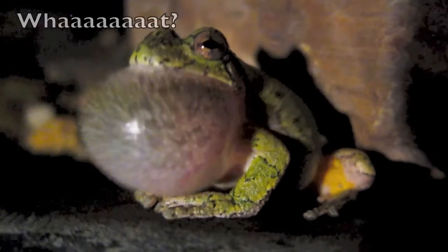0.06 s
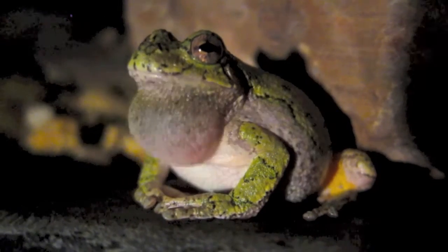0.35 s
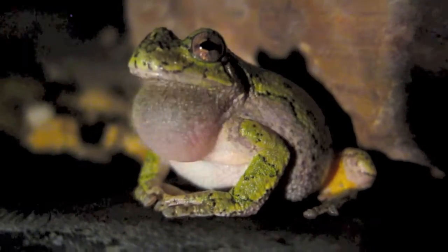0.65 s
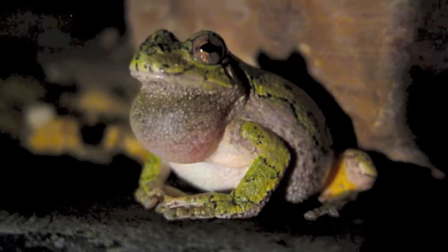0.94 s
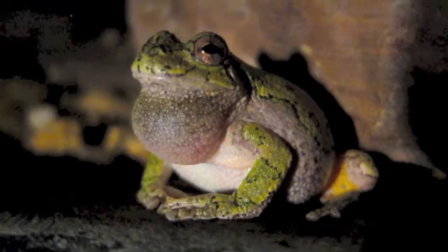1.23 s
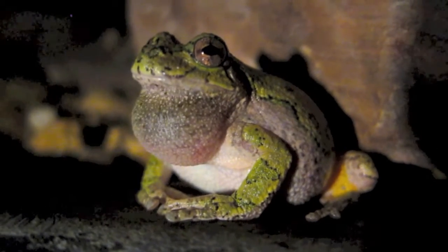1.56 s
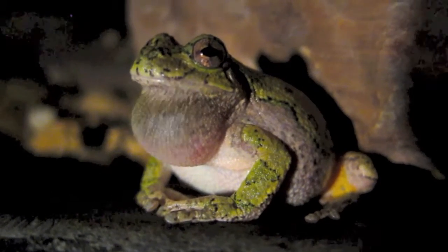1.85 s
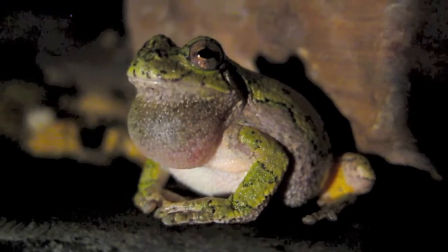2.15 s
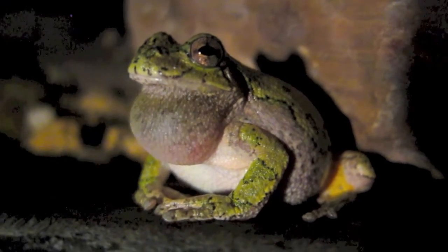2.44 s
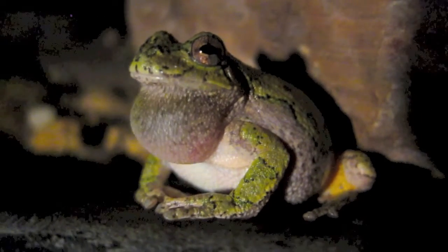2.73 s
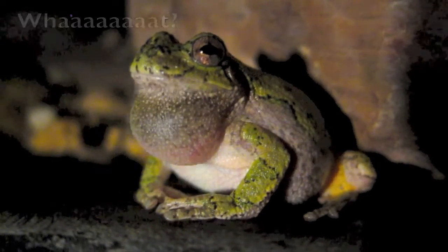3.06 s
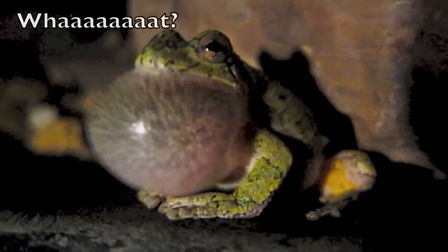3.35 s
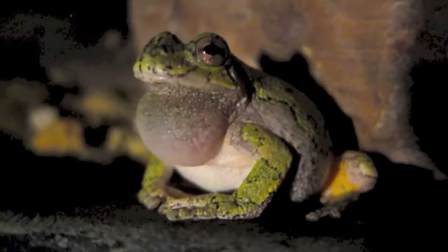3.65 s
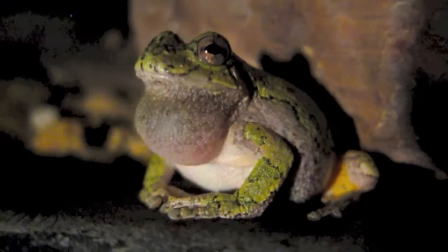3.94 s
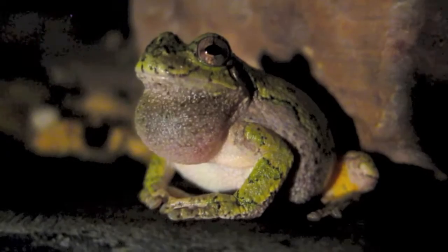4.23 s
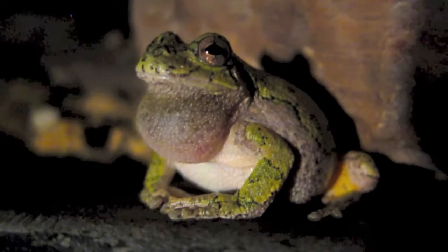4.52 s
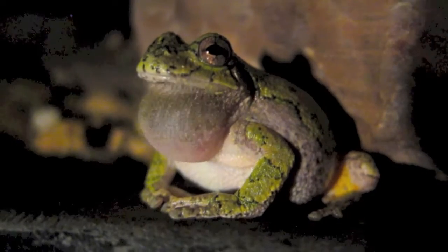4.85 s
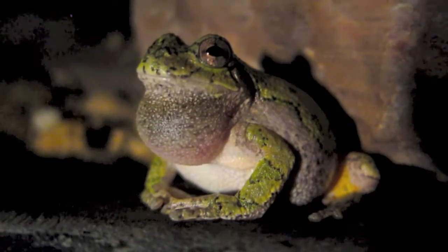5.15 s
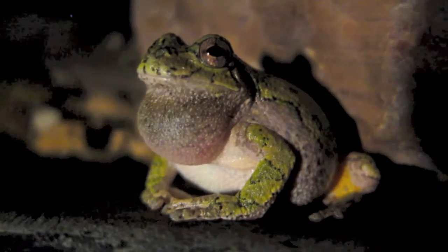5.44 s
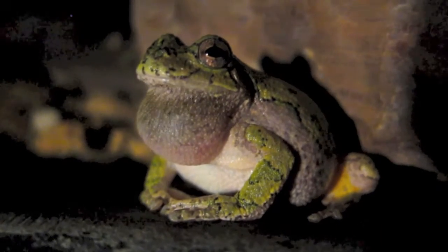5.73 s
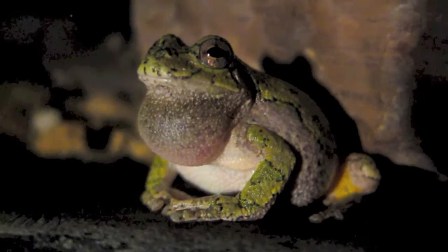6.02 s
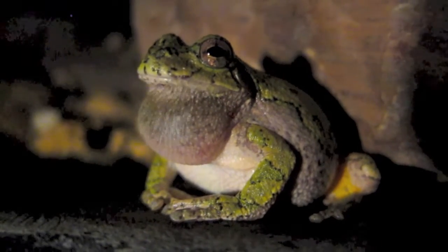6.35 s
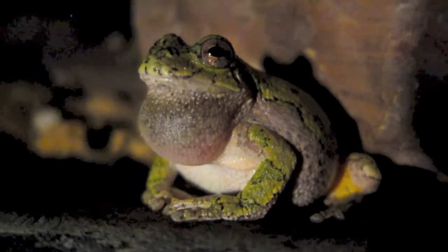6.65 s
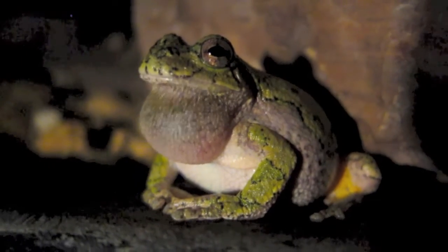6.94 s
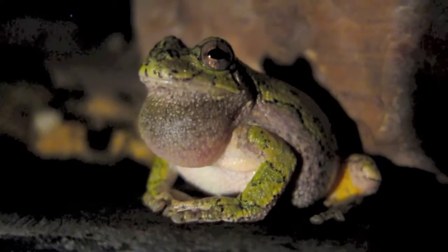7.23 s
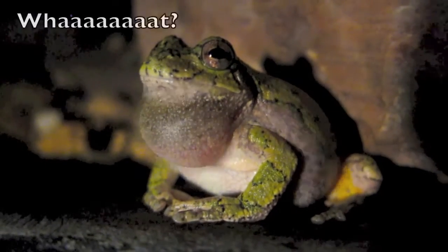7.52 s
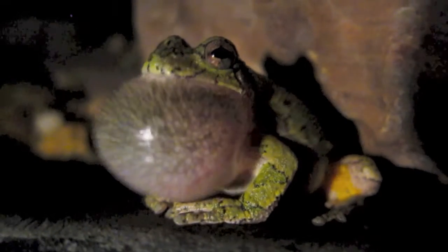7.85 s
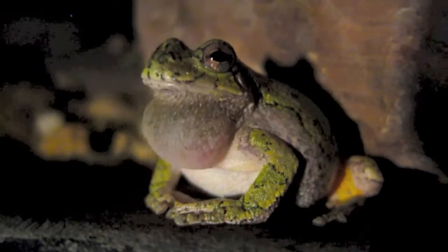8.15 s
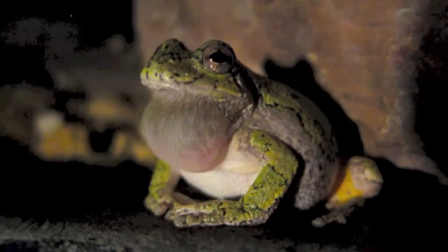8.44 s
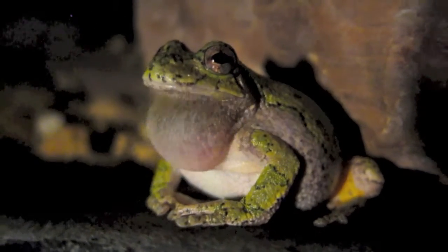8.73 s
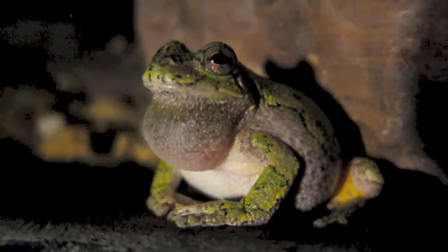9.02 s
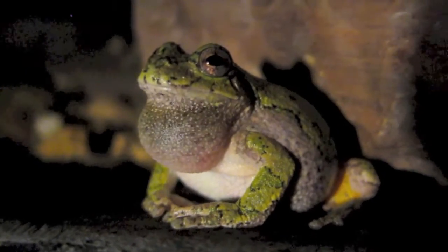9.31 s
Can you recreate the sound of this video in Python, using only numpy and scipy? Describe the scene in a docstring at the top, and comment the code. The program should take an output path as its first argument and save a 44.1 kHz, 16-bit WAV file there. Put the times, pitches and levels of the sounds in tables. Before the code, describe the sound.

A single treefrog calls very close to the microphone beside a garden pond at night. Its first trill is already under way and ends at about 0.2 seconds. Two more come at about 3.1 and 7.6 seconds, each lasting under half a second. Each is a loud, rapid run of high, ringing, slightly buzzy pulses that quickly climb in pitch and strength, then hold steady. Much more quietly, a little to the left, water trickles into the pond throughout, with a fine fizz, soft bubbling, plinking drips and tiny sharp splashes. The drips are busiest from about 1 to 2.5 seconds, from 5 to 7.3, and again around 9. A faint, low, distant rumble lies underneath. Each trill pushes the background down in level, and the water swells back slowly afterwards, carrying on until the end at about 9.5 seconds.

```python
"""A treefrog, close to the microphone beside a garden pond at night, gives three short trills.
Each trill is a run of larynx pulses that rise in pitch and ring on in the vocal sac.
A little to the left, water trickles into the pond: spray fizzes, and drips and splashes trap
ringing bubbles. The distant night murmurs underneath. The recorder's gain control ducks
under each trill and lets the water swell back slowly."""
import sys
import numpy as np
from scipy import signal
from scipy.fft import rfft, irfft, next_fast_len
from scipy.io import wavfile
from scipy.ndimage import uniform_filter1d

SR = 44100
rng = np.random.default_rng(int(sys.argv[2]) if len(sys.argv) > 2 else 0)


def dump_mix(stems):
    """Bounce the given channels to the path in sys.argv[1] as a 16-bit WAV at rate SR."""
    frames = np.atleast_2d(stems).T  # one column per channel
    limited = np.clip(frames, -1, 1)  # hard clip at full scale
    pcm = np.round(limited * 32767).astype(np.int16)
    wavfile.write(sys.argv[1], SR, pcm)


N = 418068


def from_db(db):
    """Decibels to gain."""
    return 10 ** (np.asarray(db) / 20)


def rms_one(x):
    """Scale to unit power."""
    return x / np.sqrt(np.mean(x ** 2) + 1e-20)


def add(track, start_s, sound):
    """Mix a sound into a track."""
    at = max(0, round(start_s * SR))
    part = sound[..., :max(0, N - at)]
    track[..., at:at + part.shape[-1]] += part


def delayed(x, seconds):
    """A later copy of a sound."""
    size = next_fast_len(N + SR // 10)
    hz = np.fft.rfftfreq(size, 1 / SR)
    return irfft(rfft(x, size) * np.exp(-2j * np.pi * hz * seconds), size)[..., :N]


def coloured(x, spectrum):
    """Shape a sound by a smooth curve of (Hz, dB) points; rms 1."""
    size = next_fast_len(N + SR // 10)
    hz, level_db = np.transpose(spectrum)
    gain = from_db(np.interp(np.log(np.fft.rfftfreq(size, 1 / SR) + 1), np.log(hz), level_db))
    return rms_one(irfft(rfft(x, size) * gain, size)[..., :N])


def treble(x, above_hz):
    """The part of a sound above a frequency."""
    return signal.sosfiltfilt(signal.butter(4, above_hz, "high", fs=SR, output="sos"), x)


def drift(rate_hz):
    """A random curve over the whole scene, with a spread near 1."""
    steps = np.arange(N) * rate_hz / SR
    return np.interp(steps, np.arange(N // 20), rng.standard_normal(N // 20))


def wavering(count, size):
    """Noise smoothed over size samples; rms 1."""
    return rms_one(uniform_filter1d(rng.standard_normal(count), size=size))


def left_first(x, lead_s):
    """A source off to the left reaches that side of the microphone first."""
    x = np.atleast_2d(x)
    return np.array([x[0], delayed(x[-1], lead_s)])


def garden(x, t60, wet_db, dull_hz, gap_s):
    """Scatter from stones, plants and boards: a short tail, different in each channel."""
    t = np.arange(SR // 3) / SR
    tail = rng.standard_normal((2, len(t))) * from_db(-60 * t / t60) * (t > gap_s)
    tail /= np.sqrt(np.sum(tail ** 2, axis=1, keepdims=True))
    tail = signal.sosfilt(signal.butter(1, dull_hz, fs=SR, output="sos"), tail)
    return from_db(wet_db) * signal.fftconvolve(np.atleast_2d(x), tail, axes=1)[:, :N]


def trill(start_s, period_s, head_start, pulses=23, plateau_hz=1269, flat_hz=287, wobble_hz=9):
    """Effort builds and pitch climbs as the sac fills. Each row: start in s, pitch in Hz, effort 0-1."""
    k = np.arange(pulses)
    warmed = k + head_start
    # pulses come slower at both ends of the trill
    gaps_s = period_s + .0041 * np.exp(-warmed / 1.6) + .0018 * np.exp((k - k[-2]) / 1.6)
    pitch_hz = plateau_hz - flat_hz * np.exp(-warmed / 2.04) + wobble_hz * rng.standard_normal(pulses)
    effort = 1 - np.exp(-(warmed / 2.15) ** 1.5)
    stagger_s = .00016 * rng.standard_normal(pulses)
    return zip(start_s + np.cumsum(gaps_s) - gaps_s + stagger_s, pitch_hz, effort)


def tick(effort, hz=2300, level_db=-22, octave_db=-6, peak_s=.0006):
    """The faint tick before a push of air; it also stirs the sac an octave lower."""
    t = np.arange(SR // 100) / SR
    phase = 2 * np.pi * hz * (1 + .08 * rng.standard_normal()) * t
    shape = np.e * t / peak_s * np.exp(-t / peak_s)
    return from_db(level_db) * effort * shape * (np.sin(phase) + from_db(octave_db) * np.sin(phase / 2))


def sac_puff(t, level_db=-31, swell_s=.0015):
    """The sac jerks outward and settles: a faint low puff."""
    swell = t / swell_s
    return from_db(level_db) * np.e * swell * (1 - swell / 2) * np.exp(-swell)


# The frog's harmonics at close range, from the fundamental up.
# Each row: relative level in dB, left minus right in dB.
FROG_HARMONICS = [(-6.5, 2.8), (-0.5, -2.5), (-18.5, -1), (-25.5, 0.5), (-24.5, -6), (-26.5, -6.5),
                  (-38.5, -5.5), (-33, -6), (-38.5, -18), (-36.5, -14.5)]


def frog_pulse(pitch_hz, effort, glide=.13, glide_s=.006665, rasp_db=-27, croak_db=-17):
    """One push of air: the pitch climbs, then the larynx stops and the sac rings on alone."""
    larynx_t60, sac_t60 = .010, .021
    body_hz, body_db, body_t60 = 1045, -17, .026
    t = np.arange(SR // 25) / SR
    slack = 1 / (1 + np.exp((effort - .5) / .08))   # the folds tighten and buzz past half effort
    push_s = (.0045 + .0025 * effort ** 5) * (1 + .04 * rng.standard_normal())
    climb = np.clip(t / (glide_s * (1 + .09 * rng.standard_normal())), 0, 1) ** 1.8
    hz = pitch_hz * (.9517 + glide * climb - .06 * slack * (1 - climb))   # slack pulses start flatter
    jitter = 1 + .009 * wavering(len(t), size=14)
    phase = 2 * np.pi * np.cumsum(hz * jitter) / SR
    opening = (1 - np.exp(-(t / (.0009 + .0032 * slack)) ** 2)) ** (1 + slack)
    after_s = np.maximum(t - push_s, 0)
    overtones_db = -16 * slack + .6 * rng.standard_normal()   # a weak push is mostly fundamental
    larynx = opening * from_db(overtones_db - 60 * after_s / larynx_t60)
    # while the folds buzz they draw strength from the fundamental
    drawn_db = 7 * (1 - slack) * np.exp(-((t / push_s - .36) / .38) ** 2)
    sac = opening * from_db(4 * slack - drawn_db - 60 * after_s / sac_t60)
    # the folds only snap shut once they swing fully, so the buzz starts late and ends early
    snap = (1 - np.exp(-(t / .0013) ** 2)) / (1 + np.exp((t - push_s + .0001) / .0006))
    buzz = larynx * snap * from_db(9 * slack)
    rasp = from_db(rasp_db) * buzz * (1 + np.cos(phase)) / 2 * rng.standard_normal((2, len(t)))
    tone = np.zeros((2, len(t)))
    for k, (level_db, pan_db) in enumerate(FROG_HARMONICS, 1):
        flutter = from_db(1.3 * rng.standard_normal()) * (1 + .3 * wavering(len(t), size=40))
        envelope = sac if k == 1 else larynx if k == 2 else buzz * flutter
        if k == 3:   # the third harmonic blooms as the pitch climbs
            envelope = envelope * (.45 + .9 * climb)
        sides = from_db([[level_db + pan_db / 2], [level_db - pan_db / 2]])
        tone += sides * envelope * np.sin(k * phase)
    # slack folds flap unevenly: the first pulses croak
    croak = from_db(croak_db) * slack * opening * snap * np.sin(2 * phase) * wavering(len(t), size=16)
    # the push knocks a lower ring out of the body, which beats against the fundamental
    body_ring = from_db(body_db - 60 * t / body_t60) * np.cos(2 * np.pi * body_hz * t)
    body = (1 - slack) * opening * body_ring
    loudness = np.tanh(effort / .24)
    return loudness * (rasp + tone + croak + body + effort * sac_puff(t))


# The trills, close to the microphone; the first is already under way.
# Each row: start in seconds, pulse period in seconds, head start of the effort in pulses.
FROG_TRILLS = [(-.2331, .01755, 1), (3.1469, .01759, .15), (7.5997, .01737, .75)]


def frog(level_db=19, tick_lead_s=.0034, bounce_s=.00204, far_db=-31, far_s=.0095):
    """The frog, with a close bounce that colours the overtones and a fainter slap from farther off."""
    voice = np.zeros((2, N))
    for row in FROG_TRILLS:
        for k, (s, pitch_hz, effort) in enumerate(trill(*row)):
            if s > -tick_lead_s:
                add(voice, s, frog_pulse(pitch_hz, effort))
            if k > 0 and s > tick_lead_s:
                add(voice, s - tick_lead_s, tick(effort))
    bounce = .3 * treble(delayed(voice, bounce_s), above_hz=1800)
    slap = from_db(far_db) * delayed(voice, far_s)
    voice = left_first(voice + bounce + slap, lead_s=.00004)
    near = garden(voice, t60=.06, wet_db=-23, dull_hz=7000, gap_s=.004)
    yard = garden(voice, t60=.31, wet_db=-49, dull_hz=4000, gap_s=.033)
    return from_db(level_db) * (voice + near + yard)


# The trickle into the pond. Each row: time in seconds, relative strength in dB.
TRICKLE_STRENGTH = [(0, -1), (1.45, 3.5), (2.2, 1.5), (4, -1.5), (5.7, 3), (6.5, 0.5), (7.9, -2), (9.3, 3)]


def flow_db(s):
    """The trickle swells and eases: its strength at the given times."""
    return np.interp(s, *np.transpose(TRICKLE_STRENGTH))


# The colour of the spray over the pond. Each row: frequency in Hz, relative gain in dB.
SPRAY_SPECTRUM = [(500, -34), (1500, -1.5), (2300, -7.5), (2750, -3), (3300, 0), (4600, -4), (5450, 0),
                  (6500, -6), (7300, -4), (10000, -4.5), (12500, -7), (14500, -12.5), (16000, -24)]


def spray(count=17000, cycles=25, scatter_s=.00004, pan_db=2.0, hiss=.84, samples=256):
    """Tiny droplets fizz in clumps over a hiss; each rings briefly at its own pitch and place."""
    at = rng.integers(0, N - samples, count)
    hz = rng.uniform(1670, 14140, (count, 1))
    clumps_db = 2.9 * drift(rate_hz=60) + 1.7 * drift(rate_hz=14)   # quick flicker, slower swell
    droplet_db = 2.5 * np.minimum(rng.exponential(1, count), 3.8)
    strength = from_db(droplet_db + clumps_db[at])[:, None] * np.sqrt(hz)
    lag, pan = rng.standard_normal((2, count, 1))
    where = (at[:, None] + np.arange(samples)).ravel()
    t, channels = np.arange(samples) / SR, []
    for side in (1, -1):
        arrival_s = scatter_s * (1 + side * lag / 2)
        turns = (hz * np.maximum(t - arrival_s, 0)).astype(np.float32)
        rings = np.sin(2 * np.pi * turns) * from_db(-60 * turns / cycles)
        gain = strength * from_db(side * pan * pan_db / 2)
        channels.append(np.bincount(where, (gain * rings).ravel(), N))
    return coloured(rms_one(np.array(channels)) + hiss * rng.standard_normal((2, N)), SPRAY_SPECTRUM)


def bubble(hz, t60, rise, attack_s=.00045):
    """A trapped bubble rings; a positive rise lifts its pitch as it nears the surface."""
    t = np.arange(int(t60 * SR) + 2) / SR
    envelope = (1 - np.exp(-t / attack_s)) * from_db(-60 * t / t60)
    return envelope * np.sin(2 * np.pi * hz * (t + rise * t * t / 2))


# The colour of the bubbling where the trickle lands. Each row: frequency in Hz, relative gain in dB.
GURGLE_SPECTRUM = [(250, -24), (470, -28), (575, 3.5), (660, 0.5), (760, 7), (900, 4), (1070, 0.5),
                   (1220, 2.5), (1520, -2.5), (1730, 6), (2300, -2), (3500, -47.5)]


def gurgle(count=6000, spread_db=1.0, cycles=20, rise=7):
    """Crowds of small bubbles ring under the falling water."""
    out = np.zeros(N)
    for (when, pitch, climb), strength in zip(rng.random((count, 3)), rng.standard_normal(count)):
        hz = 480 * 4.695 ** pitch
        gain = from_db(spread_db * min(strength, 2)) * np.sqrt(hz)
        add(out, when * N / SR, gain * bubble(hz, cycles / hz, rise * climb))
    return coloured(out, GURGLE_SPECTRUM)


# The colour of the night, far from the microphone. Each row: frequency in Hz, relative gain in dB.
NIGHT_SPECTRUM = [(15, -13), (35, -21), (55, -1.5), (120, 0), (185, -1), (270, -11.5), (370, -5.5),
                  (600, -4), (1500, -39)]


def night_rumble(level_db=-41.5, apart=.24):
    """Low murmur of the distant night, nearly alike in both channels."""
    noise = rng.standard_normal(N) + apart * rng.standard_normal((2, N))
    return from_db(level_db) * coloured(noise, NIGHT_SPECTRUM)


def stray_drops(low_hz, high_hz, level_db, spread_db, count):
    """Lesser drops fall at random, louder in strong flow. Each row: start in s, pitch in Hz, dB."""
    when, pitch, strength = rng.random((count, 3)).T
    s = when * N / SR
    hz = low_hz * (high_hz / low_hz) ** pitch
    return np.c_[s, hz, level_db + spread_db * (strength - .5) + flow_db(s)]


# The loudest drips into the pond. Each row: start in seconds, bubble pitch in Hz,
# relative level in dB, rise in pitch as a share per second (negative falls).
POND_DRIPS = [(0.335, 993, -19, -3), (0.551, 740, -20.5, 1), (0.886, 730, -22.5, 2.5), (0.9, 784, -21, 1.5),
              (0.931, 904, -18, 6.5), (0.958, 934, -20, 19), (1.087, 1353, -18.5, 5), (1.179, 925, -19, 11),
              (1.46, 782, -19, 4.5), (1.556, 1680, -11.5, 10), (1.649, 1237, -11, -5), (1.705, 730, -19, 1),
              (1.781, 1430, -21, -2.5), (1.956, 1593, -15.5, 33), (2.049, 925, -20, 2.5),
              (2.257, 600, -22, -1), (2.356, 1640, -18.5, 6), (2.436, 1520, -16.5, -15),
              (2.52, 960, -21, 5), (4.969, 993, -14, 2), (5.063, 1124, -19.5, -6), (5.501, 697, -12, 21.5),
              (5.505, 1280, -14, 11.5), (5.524, 646, -18.5, 4), (5.626, 1264, -26, 2),
              (5.653, 1320, -23, 1.5), (5.695, 1960, -18.5, 13), (5.896, 2000, -16, 4),
              (5.932, 1265, -22, -2), (5.961, 1219, -20, -3), (5.991, 1720, -20.5, -2),
              (6.241, 731, -13.5, 5), (6.305, 846, -20.5, 6), (6.341, 923, -14.5, 3), (6.376, 915, -24, 2),
              (6.379, 1230, -26, 3), (6.428, 953, -14, -3), (6.432, 1226, -25, 0), (6.678, 1660, -23, 2.5),
              (6.784, 923, -20, 4), (6.822, 757, -16.5, 5), (6.852, 733, -13, 1), (6.899, 780, -21, 24),
              (6.91, 997, -14.5, 35), (6.932, 1690, -15.5, 4), (7.002, 1220, -25, 1),
              (7.05, 1200, -25.5, -2), (7.211, 1290, -19, -3), (7.228, 1270, -23.5, 3),
              (8.731, 760, -20, 2.5), (8.881, 1010, -12.5, 3), (9.035, 960, -8.5, 1.5),
              (9.335, 732, -15.5, 2.5), (9.402, 769, -16, 6)]


def drips(stray_rise=5, slap_db=-14, slap_t60=.015, burst_cycles=29, shed_count=6, shed_db=-9.5):
    """Each drop slaps, plinks until its bubble bursts, and sheds a few small bubbles."""
    out, t = np.zeros(N), np.arange(SR // 25) / SR
    faint = stray_drops(low_hz=603, high_hz=1803, level_db=-28, spread_db=-6.5, count=30)
    for s, hz, db, rise in POND_DRIPS + [(*drop, stray_rise) for drop in faint]:
        slap = from_db(slap_db - 60 * t / slap_t60) * wavering(len(t), size=28)
        add(out, s, from_db(db) * slap * np.sin(2 * np.pi * hz * t))
        plink = bubble(hz, t60=.11 * (800 / hz) ** .83, rise=rise)   # bigger bubbles ring longer
        turns = hz * np.arange(len(plink)) / SR
        alive = np.exp(-(turns / burst_cycles) ** 4)
        wobble = 1 + .18 * wavering(len(plink), size=130)
        add(out, s, from_db(db) * plink * alive * wobble)
        for late, pitch, strength in rng.random((shed_count, 3)):
            small_hz = 620 * (1750 / 620) ** pitch
            small = bubble(small_hz, t60=22 / small_hz, rise=stray_rise)
            add(out, s + .055 * late, from_db(db + shed_db) * strength * small)
    return out


# The loudest sharp little splashes on the pond.
# Each row: start in seconds, bubble pitch in Hz, relative level in dB.
POND_SPLASHES = [(1.391, 4090, -16.5), (1.468, 3240, -10.5), (1.533, 5900, -7), (1.558, 3170, -14),
                 (1.6335, 3210, 1), (1.6335, 4800, -10), (1.650, 3324, -13), (2.008, 5640, -13.5),
                 (2.018, 10400, -9), (2.140, 4420, -19), (2.208, 5650, -16), (2.309, 3330, -32),
                 (2.436, 3250, -19), (2.436, 5400, -13.5), (2.489, 4090, -20.5), (2.511, 5500, -12),
                 (2.538, 3750, -24), (2.561, 5400, -13), (2.917, 5500, -17), (5.107, 2820, -16.5),
                 (5.295, 7330, -15), (5.310, 3300, -16), (5.397, 4860, -11.5), (5.403, 3090, -11),
                 (5.567, 11500, -18), (5.694, 3830, -25), (5.722, 4500, -17), (5.779, 3250, -15),
                 (5.800, 3110, -17), (5.849, 6300, -16), (5.853, 3790, -23.5), (5.972, 3280, -27),
                 (5.990, 3450, -23), (6.104, 6400, -16), (6.110, 3190, -27.5), (6.121, 3660, -23),
                 (6.148, 4500, -20), (6.172, 3820, -19.5), (6.173, 5680, -13), (6.204, 11500, -23),
                 (6.223, 2370, -14.5), (6.233, 5070, -20), (6.314, 3600, -17.5), (6.326, 3430, -21),
                 (6.344, 11100, -23), (6.405, 10500, -18), (6.406, 5630, -9.5), (6.424, 11500, -19),
                 (6.524, 3150, -16), (6.525, 6300, -14), (6.544, 7090, -21), (6.613, 3840, -25),
                 (6.639, 5500, -7.5), (6.640, 11100, -23), (6.722, 4280, -19.5), (6.733, 11400, -20),
                 (6.752, 11800, -19), (6.790, 3270, -24), (6.810, 3920, -26), (6.884, 3260, -20.5),
                 (6.900, 920, -11), (6.958, 5400, -13), (6.958, 11400, -19), (6.970, 12100, -21.5),
                 (7.014, 10500, -12), (7.014, 6300, -14), (7.015, 4650, -19.5), (7.067, 11600, -25),
                 (7.106, 4130, -25), (7.179, 3270, -36), (7.179, 11500, -22.5), (7.210, 4000, -29),
                 (7.269, 6400, -16), (7.276, 11800, -23), (7.430, 3080, -25), (7.441, 7150, -22.5),
                 (9.019, 3540, -15), (9.312, 10400, -8), (9.344, 3170, -18), (9.431, 3380, -21)]


def splashes(bandwidth_share=.46, spray_db=-8, spray_t60=.018, slap_db=-16):
    """A drop slaps the surface: a bright tick, then a tiny bubble rings inside a burst of spray."""
    out, t = np.zeros((2, N)), np.arange(SR // 40) / SR
    fade = from_db(-60 * t / spray_t60)
    fine = stray_drops(low_hz=6000, high_hz=13200, level_db=-23, spread_db=4, count=70)
    faint = stray_drops(low_hz=2900, high_hz=5800, level_db=-32, spread_db=5, count=130)
    for s, hz, db in [*POND_SPLASHES, *fine, *faint]:
        resonance = signal.iirpeak(hz, 1 / bandwidth_share, fs=SR)
        noise = fade * rng.standard_normal((2, len(t)))
        burst = signal.lfilter(*resonance, signal.lfilter(*resonance, noise))
        burst = from_db(spray_db) * rms_one(burst) * np.sqrt(np.mean(fade ** 2))
        slap = from_db(slap_db) * fade ** 2 * rms_one(np.diff(rng.standard_normal((2, len(t) + 1))))
        ring = 2.4 * bubble(hz, t60=.011, rise=7.9, attack_s=.0008)
        add(out, s, from_db(db) * (slap + burst))
        add(out, s, from_db(db) * ring)
    return out


def pond(spray_db=-30, gurgle_db=-36, pan_db=-.5, top_lean=.33):
    """Spray and splashes above, bubbles and drips below, with a little ring from the basin."""
    trickle_db = flow_db(np.arange(N) / SR)
    splashing = splashes()
    high = from_db(spray_db + trickle_db) * spray() + splashing
    high += top_lean * treble(high, above_hz=13000) * [[-1], [1]]   # brighter on the right
    low = from_db(gurgle_db + trickle_db) * gurgle() + drips()
    basin = garden(low + splashing, t60=.12, wet_db=-16, dull_hz=4000, gap_s=.002)
    water = left_first(high, lead_s=.0002476) + left_first(low, lead_s=.00014) + basin
    return water * from_db([[pan_db / 2], [-pan_db / 2]])


def housing(x, notch_hz, width_hz, spread_hz):
    """The microphone housing cuts a treble notch, whose shape depends on where the sound comes from."""
    for hz in (notch_hz - spread_hz, notch_hz, notch_hz + spread_hz):
        x = signal.lfilter(*signal.iirnotch(hz, hz / width_hz, fs=SR), x)
    return x


def scene():
    """At the pond's edge: the frog close by, the trickling water and the night far off."""
    water = housing(pond(), notch_hz=8410, width_hz=1090, spread_hz=330)
    trills = housing(frog(), notch_hz=8090, width_hz=250, spread_hz=130)
    return trills + water + night_rumble()


def gain_control(x, ceiling_db=-3.5, fast_db_per_s=16, slow_db_per_s=4.5, slow_share=.49):
    """Peaks over the ceiling pull the gain down at once; it returns briskly, then creeps."""
    t = np.arange(N) / SR
    over_db = np.maximum(20 * np.log10(np.abs(x).max(axis=0) + 1e-9) - ceiling_db, 0)
    over_db[0] = over_db[:SR // 20].max()   # the first trill is already under way
    fast = np.maximum.accumulate(over_db + fast_db_per_s * t) - fast_db_per_s * t
    slow = np.maximum.accumulate(slow_share * over_db + slow_db_per_s * t) - slow_db_per_s * t
    pole = np.exp(-1 / (.00047 * SR))   # 0.47 ms attack
    cut_db, _ = signal.lfilter([1 - pole], [1, -pole], np.maximum(fast, slow), zi=[pole * over_db[0]])
    return x * from_db(-cut_db)


def record(dry, self_noise_db=-68, cutoff_hz=16000):
    """The recorder: gain control, softly rounded peaks, a dull electronic floor and a steep top cut."""
    floor = coloured(rng.standard_normal((2, N)), [(40, -9.5), (220, -7.5), (1500, -28), (16000, -38)])
    levelled = gain_control(dry)
    rounded = levelled / (1 + levelled ** 8) ** (1 / 8)
    lowpass = signal.ellip(10, .1, 80, cutoff_hz, fs=SR, output="sos")
    return signal.sosfilt(lowpass, rounded + from_db(self_noise_db) * floor)


dry = scene()
out = record(dry)
dump_mix(out)
```